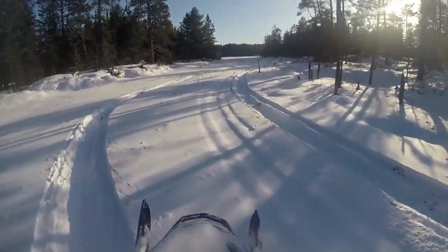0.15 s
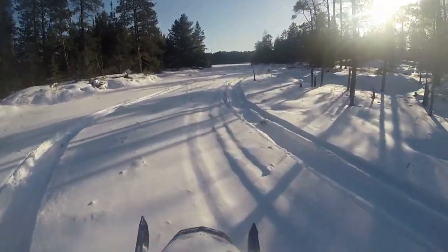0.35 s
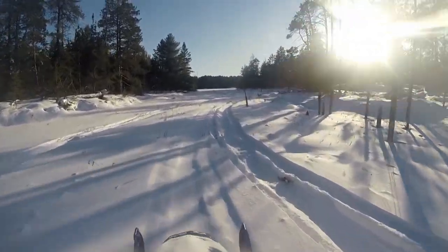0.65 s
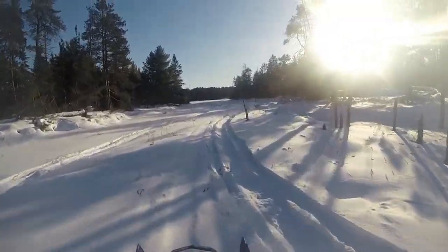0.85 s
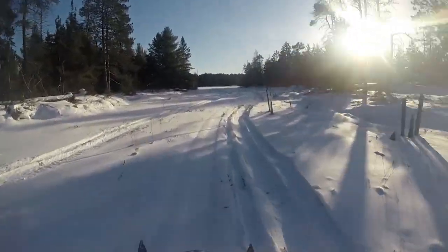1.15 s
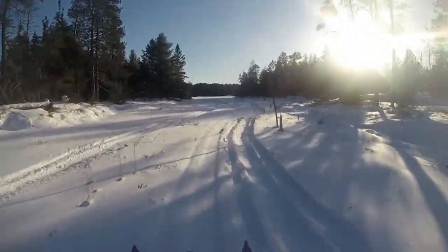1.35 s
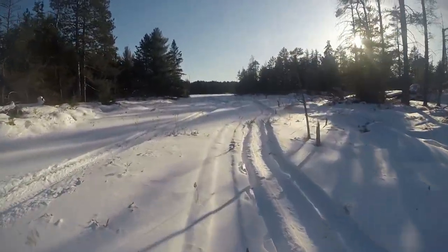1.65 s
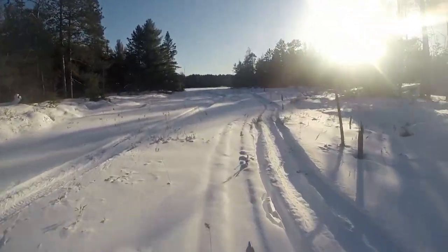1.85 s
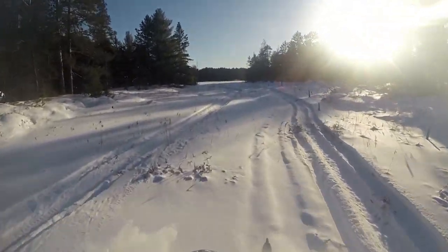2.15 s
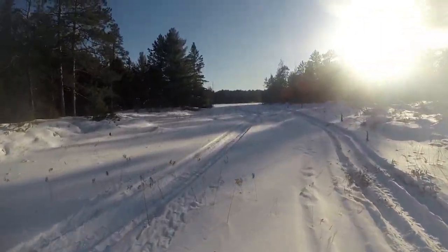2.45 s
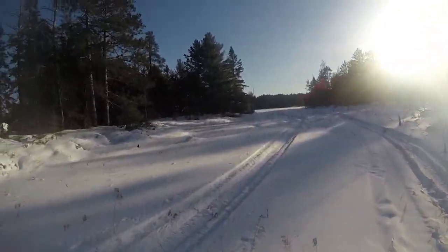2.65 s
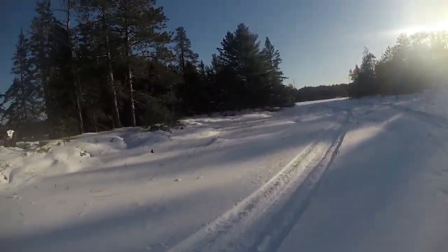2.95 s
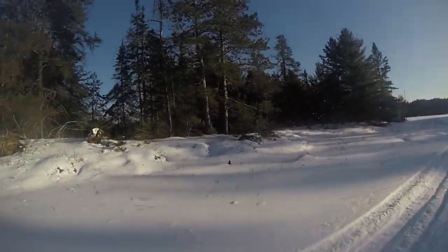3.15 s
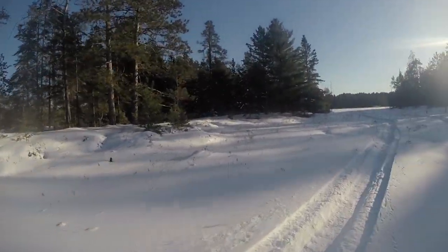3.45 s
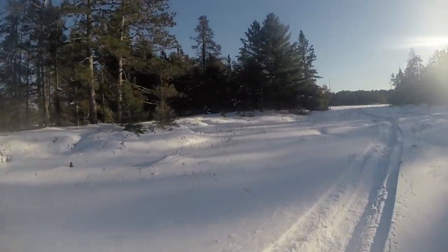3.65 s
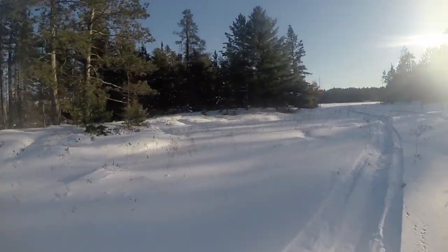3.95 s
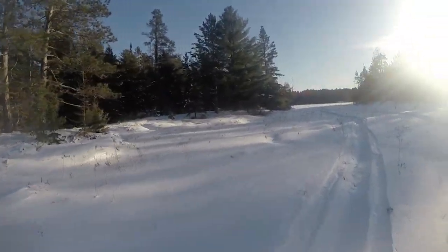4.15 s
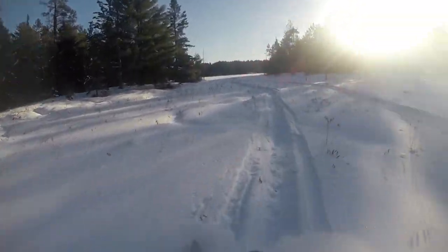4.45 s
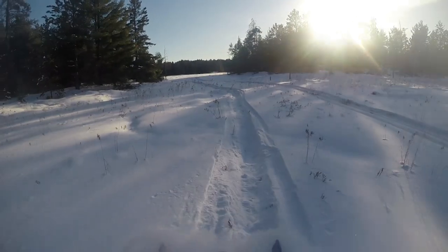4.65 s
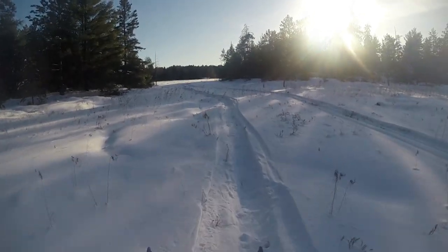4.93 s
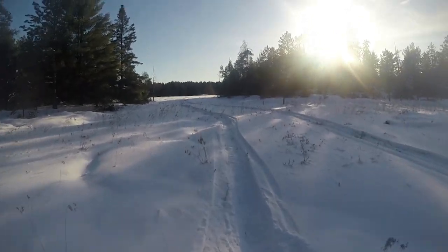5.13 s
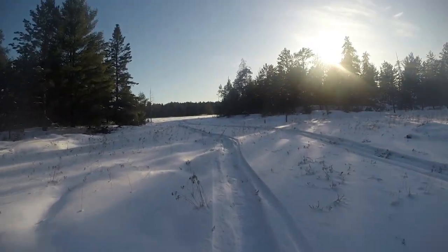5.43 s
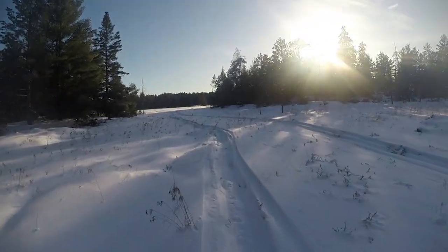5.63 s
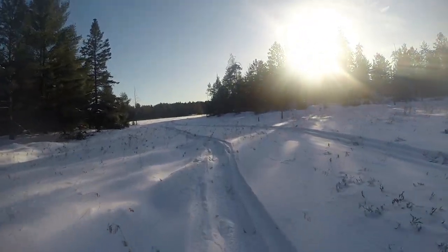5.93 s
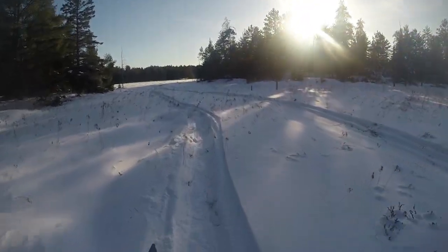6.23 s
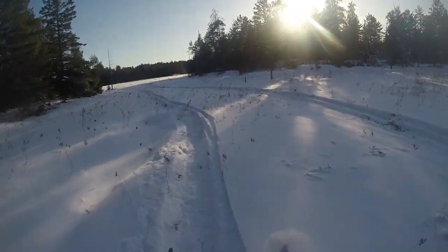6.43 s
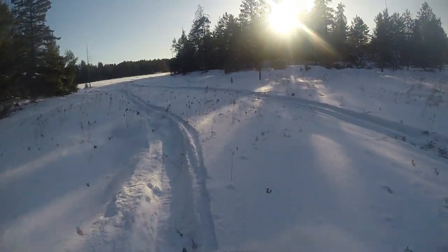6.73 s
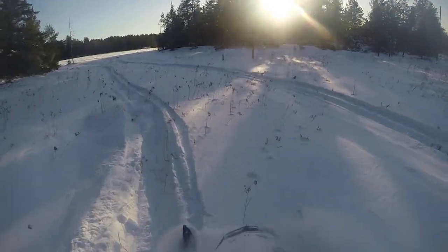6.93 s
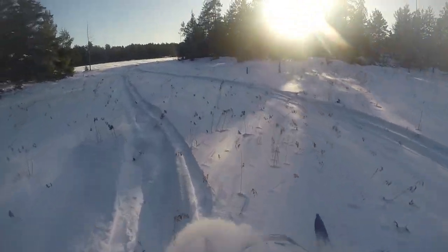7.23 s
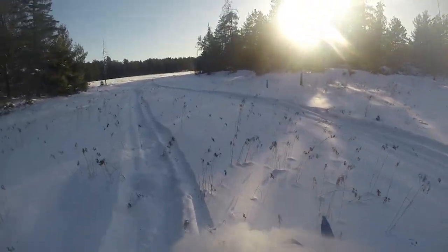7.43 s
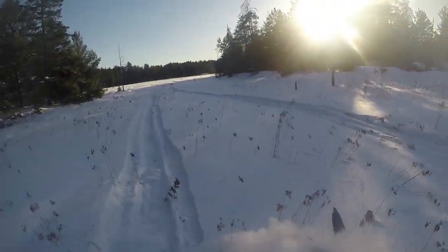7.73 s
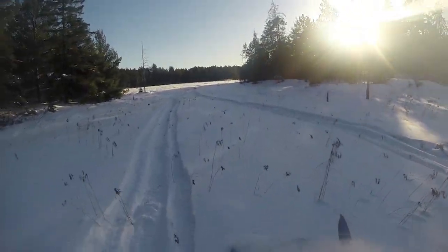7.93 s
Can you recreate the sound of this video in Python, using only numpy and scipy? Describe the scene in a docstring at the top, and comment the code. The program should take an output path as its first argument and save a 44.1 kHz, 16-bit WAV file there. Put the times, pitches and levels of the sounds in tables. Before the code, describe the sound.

Close, boxed-in sound of a snowmobile from the rider's helmet. The engine screams with a fuzzy track whine for the first second, then falls to a lower buzzing growl, sagging quietest just after four seconds. It surges, climbs to a brief peak around six, drops back, and finally revs up loud. Snow hiss, low mount thrum and a few ice ticks surround it.

```python
"""A three-cylinder snowmobile engine heard through a closed camera case on the rider's helmet.
Sines on crank orders and noise puffed at each firing make its notes and exhaust roar, led by speed and load.
The track adds a hum and a fuzzy chain whine; the skis scrape the snow in a narrow band of noise.
A low wavering note and filtered noise make the mount's thrum and the wind and chassis rumble,
and short noise bursts are ice grains and spray striking the case."""
import sys
import numpy as np
from scipy import signal
from scipy.fft import rfft, irfft
from scipy.io import wavfile
from scipy.ndimage import map_coordinates

SR = 44100
rng = np.random.default_rng(int(sys.argv[2]) if len(sys.argv) > 2 else 0)


def waveform_to_disk(signal):
    """Save audio, clipped to [-1, 1], as 16-bit WAV at the path in sys.argv[1]."""
    frames = np.transpose(np.atleast_2d(signal))
    scaled = np.clip(frames, -1, 1) * 32767
    samples = np.round(scaled).astype(np.int16)
    wavfile.write(sys.argv[1], SR, samples)


N = 356328

# What the case lets through: (frequency [Hz], gain [dB])
CASE_RESPONSE = [(330, -17.5), (470, -19), (520, -19), (700, -22), (940, -27), (1040, -16.5), (1130, -4),
                 (1300, 2), (1500, 0), (1640, -10.5), (1790, -2), (2160, -10), (2600, -4.5), (2850, -12),
                 (3260, -10), (3520, -28.5), (4000, -29)]

BOOM_ORDERS = (3, 4, 5, 6, 9)  # multiples of the crank speed
UPPER_ORDERS = (7, 8, *range(10, 21))
MID_CRANK_HZ, MID_LUG_HZ, MID_LOUD_DB = 102.9, 140.4, -24  # reference points for the level slopes
GRIP_LUG_HZ = 217  # the track slips above this


def amp(db):
    """Decibels to gain."""
    return 10 ** (np.asarray(db) / 20)


def evened(x):
    """Scales to rms 1."""
    return x / np.sqrt(np.mean(x ** 2) + 1e-20)


def curves(rows):
    """Every column after the time, drawn as straight lines with one value a sample."""
    s, *columns = np.transpose(rows)
    return [np.interp(np.arange(N) / SR, s, c) for c in columns]


def read(points, hz):
    """Value of a spectrum at hz, interpolated along log frequency."""
    f, value = np.transpose(points)
    return np.interp(np.log(hz + 1), np.log(f + 1), value)


def bumps(x, rows):
    """Sum of bell shapes (centre, width, height) along x."""
    return sum(height * np.exp(-((x - at) / width) ** 2) for at, width, height in rows)


def wander(top_hz):
    """Slow random curve of rms 1, with 2 * top_hz random points a second joined by straight lines."""
    knots = rng.standard_normal(1000)
    return evened(map_coordinates(knots, [np.arange(N) / SR * 2 * top_hz], order=1))


def coloured(db_of, lo_hz, hi_hz):
    """Noise of rms 1 shaped by db_of(hz), with steep skirts outside the edges."""
    hz = np.fft.rfftfreq(N, 1 / SR) + 1e-3
    skirts = 1 / np.sqrt((1 + (lo_hz / hz) ** 16) * (1 + (hz / hi_hz) ** 16))
    spectrum = rfft(rng.standard_normal(N)) * amp(db_of(hz)) * skirts
    return evened(irfft(spectrum, N))


def resonate(x, hz, width):
    """A resonance that can glide: shifts hz down to zero, smooths twice and shifts back."""
    turn = np.exp(2j * np.pi * np.cumsum(hz * np.ones(N)) / SR)
    r = np.exp(-np.pi * width / SR)
    smooth = signal.lfilter([(1 - r) ** 2], [1, -2 * r, r * r], x / turn)
    return 2 * (turn * smooth).real


def ground_doublings(lug_hz):
    """Ground speed in doublings from the reference; it stops rising once the track slips."""
    return np.log2(np.minimum(lug_hz, GRIP_LUG_HZ) / MID_LUG_HZ)


def mount(loud_db):
    """The helmet mount shakes at its own low note over wind and chassis rumble."""
    # Slow swells and dips of the thrum: (time [s], bell width [s], level change [dB])
    thrum_swells = [(.18, 0.1, 10), (.6, 0.27, 7.5), (1.15, 0.089, 2.5), (1.4, 0.13, 14.5), (2.2, 0.32, -1),
                    (2.62, 0.24, 7.5), (3.25, 0.17, 1.5), (4.268, .12, 7), (4.7, .25, 0), (5.5, 0.32, 3.5),
                    (6.35, .12, 10), (6.9, 0.18, 11), (7.3, .25, 8)]
    # Wind and chassis rumble: (time [s], level [dB])
    rumble_level = [(0, -38.5), (1, -36.5), (1.7, -42.5), (2.9, -43.5), (3.4, -47), (3.75, -48), (4.3, -51),
                    (4.7, -46), (5.2, -39.5), (5.8, -43.5), (7, -40.5), (8.08, -45.5)]
    # Colour of the rumble: (frequency [Hz], relative density [dB per Hz])
    rumble_colour = [(32, -30), (55, -19), (81, -2), (119, -2), (232, -8.5), (337, -9), (456, -0.5),
                     (482, 1), (520, -43), (680, -38), (1140, -120)]
    base_db, calm_below_db, calm_share = -43.5, -26.5, 0.83

    # The thrum sinks when the engine is quieter than calm_below_db
    calm_db = calm_share * np.minimum(loud_db - calm_below_db, 0)
    thrum_db = base_db + calm_db + bumps(np.arange(N) / SR, thrum_swells)
    note_hz = 40.5 + 2.5 * wander(top_hz=6.)
    note = np.sqrt(2) * np.sin(2 * np.pi * np.cumsum(note_hz) / SR)
    shake = 0.86 * note * amp(2.9 * wander(top_hz=7.))
    shake += 0.52 * coloured(lambda hz: 0 * hz, lo_hz=16, hi_hz=56)
    rumble = coloured(lambda hz: read(rumble_colour, hz), lo_hz=58, hi_hz=484)
    return amp(thrum_db) * shake + amp(curves(rumble_level)[0]) * rumble


def ticks():
    """Ice grains and sprays of snow strike the case: bright noise bursts that rise fast and die away."""
    # (time [s], peak level [dB], band centre [Hz], decay time constant [s])
    strikes = [(1.2126, -18, 5350, 0.0019), (1.736, -18.5, 3070, 0.13), (2.385, -18.5, 3000, 0.21),
               (2.7093, -31, 8930, 0.00057), (3.517, -31, 10000, .0005), (3.619, -54, 10500, 0.0041),
               (3.951, -46, 9000, 0.028), (6.221, -21, 7100, 0.0042), (6.257, -25, 9530, 0.0028),
               (6.373, -30, 8400, .002)]
    out, t = np.zeros(N), np.arange(SR // 2) / SR
    for s, db, hz, decay in strikes:
        edges_hz = [0.5 * hz, min(1.2 * hz, .45 * SR)]
        band = signal.butter(3, edges_hz, "band", fs=SR, output="sos")
        envelope = np.exp(-t / decay) * (1 - np.exp(-10 * t / decay))
        burst = signal.sosfilt(band, rng.standard_normal(len(t))) * envelope
        out[round(s * SR):][:len(t)] += amp(db) * burst / abs(burst).max()
    return out


def skis(lug_hz, throttle):
    """The skis scrape the crust in a narrow, flickering hiss that follows ground speed."""
    base_db, open_db, db_per_doubling = -47.5, -12.5, 11.  # fainter while power lifts the skis
    db = base_db + open_db * throttle + db_per_doubling * ground_doublings(lug_hz)
    scrape = coloured(lambda hz: 0 * hz, lo_hz=3450, hi_hz=4630)
    return amp(db + 1.0 * wander(top_hz=13.0)) * scrape


def track(lug_hz, throttle):
    """Lugs slap the drivers in a soft hum; the chain sings a fuzzy line above while the track spins free."""
    base_db, open_db, db_per_doubling = -48, -5.5, 6.5  # softer while the engine pulls
    spin_start_s, spin_end_s, spin_edge_s, whine_db = .1, 0.99, .06, -23
    chain_ratio = 4.35  # chain teeth for each track lug

    hum_db = base_db + open_db * throttle + db_per_doubling * np.log2(lug_hz / MID_LUG_HZ)
    phase = 2 * np.pi * np.cumsum(lug_hz) / SR + 0.45 * wander(top_hz=11.0)
    hum = np.sqrt(2) * np.sin(phase) * amp(hum_db + 2.9 * wander(top_hz=8.7))

    t = np.arange(N) / SR
    spin = np.clip(np.minimum(t - spin_start_s, spin_end_s - t) / spin_edge_s + .5, 0, 1)
    whine = evened(resonate(rng.standard_normal(N), chain_ratio * lug_hz, width=40.0))
    return hum + amp(whine_db) * spin * whine


def brightness(loud_db, crank_hz, lug_hz, base_db, per_db, per_hz, per_doubling, sway_share):
    """Level in dB of a treble layer from engine loudness, crank speed, ground speed and a slow sway."""
    # The treble swells and sinks on its own besides: (time [s], level change [dB])
    treble_sway = [(0, 1.5), (1.2, 2.8), (1.9, 2.5), (2.8, 1), (3.2, -3.5), (3.9, -2), (4.4, -3), (4.75, 4),
                   (5.6, -0.1), (6.2, 2.5), (6.5, -0.5), (7, 0.7), (7.5, 0.7), (8.08, 2.5)]
    engine_db = per_db * (loud_db - MID_LOUD_DB) + per_hz * (crank_hz - MID_CRANK_HZ)
    ground_db = per_doubling * ground_doublings(lug_hz)
    return base_db + engine_db + ground_db + sway_share * curves(treble_sway)[0]


def buzz(crank_hz, turns, multiples, colour):
    """A close stack of high crank orders, each coming and going by chance; rms 1."""
    shape_db = [read(colour, k * crank_hz) for k in multiples]
    lines = sum(amp(db + 4.2 * wander(top_hz=4.)) * np.sin(2 * np.pi * (k * turns + rng.random()))
                for k, db in zip(multiples, shape_db))
    total = np.sqrt(np.sum(amp(shape_db) ** 2, axis=0))
    return evened(lines / total)


def roar(crank_hz, turns, clear_db, loud_db, can_db, lug_hz):
    """Exhaust turbulence puffed at each firing, one cylinder stronger, with snow hiss and intake fizz above."""
    # Colour of the hiss and fizz: (frequency [Hz], relative density [dB per Hz])
    treble = [(1940, -26), (3300, -3.5), (3610, -11), (4360, -6.5), (5020, -8.5), (5480, -8.5), (6420, -13),
              (6980, -21.5), (7530, -17.5), (8120, -22), (9160, -17), (11100, -23), (12700, -25),
              (14300, -35), (15000, -34)]
    # Panels that ring in the roar: (frequency [Hz], width [Hz], level against the body noise [dB])
    panels = [(1142, 35, -14.5), (1290, 46, -8.5), (2052, 67, -11), (4330, 200, -27), (5360, 52.9, -32)]
    can_hz, can_width_hz = 1630.6, 101
    speeds = loud_db, crank_hz, lug_hz
    rasp_db = brightness(*speeds, base_db=-35.5, per_db=0.55, per_hz=0.01, per_doubling=6., sway_share=0.87)
    hiss_db = brightness(*speeds, base_db=-46.5, per_db=0.74, per_hz=0.07, per_doubling=7, sway_share=0.3)
    fizz_db = brightness(*speeds, base_db=-50, per_db=0, per_hz=0.3551, per_doubling=0, sway_share=1.3)
    drive = rng.standard_normal(N)  # one turbulence excites the panels and the exhaust can

    body = coloured(lambda hz: read(CASE_RESPONSE, hz), lo_hz=273, hi_hz=2010)
    body += sum(amp(db) * evened(resonate(drive, hz, width)) for hz, width, db in panels)
    # What the order lines lose turns to roar
    body_db = loud_db - 7.5 - 0.48 * np.maximum(clear_db, -9.)
    body *= amp(body_db + 0.21 * wander(top_hz=24.54))
    can = evened(resonate(drive, can_hz, can_width_hz)) * amp(can_db)

    # The highest orders show mostly near full speed
    near_full_db = clear_db - 0.34 * np.maximum(125. - crank_hz, 0)
    rasp = coloured(lambda hz: read(CASE_RESPONSE, hz), lo_hz=2195, hi_hz=4000)
    rasp += buzz(crank_hz, turns, range(21, 27), CASE_RESPONSE) * amp(near_full_db - 2.4)
    rasp *= amp(rasp_db + 1.34 * wander(top_hz=20.))
    hiss = coloured(lambda hz: read(treble, hz), lo_hz=3000, hi_hz=7500)
    hiss += buzz(crank_hz, turns, range(27, 50), treble) * amp(near_full_db)
    hiss *= amp(hiss_db + 1.3 * wander(top_hz=15.))
    fizz = coloured(lambda hz: read(treble, hz), lo_hz=6570, hi_hz=16000)
    fizz *= amp(fizz_db + 0.71 * wander(top_hz=20.0))

    # Three firings a turn, plus one stronger cylinder once a turn
    puff = evened(1 + 0.13 * np.cos(2 * np.pi * 3 * turns) + 0.11 * np.cos(2 * np.pi * turns))
    return puff * (body + can + rasp + hiss + fizz)


def clarity():
    """Level changes in dB of the upper orders and the boom: each change ramps in and recovers."""
    # The upper orders and the boom dip or swell for a moment:
    # (time [s], ramp in [s], recovery [s], upper orders change [dB], boom change [dB])
    level_dips = [(.96, 0.1, 0.26, -16, -23), (1.32, 0.44, 0.13, -22, -7), (1.7, 0.28, 0.61, -2.5, -2.5),
                  (3.7, 0.14, 0.37, -5, -16), (5.25, .3, 0.49, -2, -0.5), (6.26, 0.1, 0.19, -15, 5),
                  (6.42, 0.17, 0.15, -14, 0.5), (6.92, .2, 0.19, -5, 1.5)]
    t = np.arange(N) / SR
    return sum(np.outer(change_db, np.interp(t, [s - ramp, s, s + back], [0, 1, 0]))
               for s, ramp, back, *change_db in level_dips)


def boom_levels(crank_hz, loud_db, boom_change_db, throttle):
    """Orders 3 to 6 follow the pipe's gain at their pitch and the throttle; the ninth goes its own way."""
    # One row for each of orders 3 to 6:
    # (strength [dB], change with throttle shut [dB], slope with crank speed [dB per Hz])
    boom_strength = [(0.5, -1.5, 0.02), (0.5, -21.5, 0.2035), (-3.5, -20.5, 0.09), (-9.5, -10, -0.1846)]
    # What the exhaust pipe favours: (frequency [Hz], gain [dB])
    pipe = [(180, -39), (205, -20), (240, -24.5), (265, -14), (290, -18), (335, -32), (360, -27),
            (385, -14), (410, -6), (440, -12.5), (474, -9), (497, -37), (700, -33.5), (820, -6), (900, -25)]
    # The ninth order is loud at the start and end, near full speed, and faint between:
    # (time [s], level [dB])
    ninth = [(0, -29), (.1, -19.5), (.3, -21), (.42, -22), (.9, -28.5), (1.0, -45), (1.3, -64.5),
             (4.8, -65.5), (5.2, -54), (5.7, -47), (6.17, -42), (6.28, -55), (6.6, -54.5), (7.0, -67),
             (7.5, -52.5), (7.7, -35), (7.79, -14), (7.87, -21), (8.08, -13.5)]
    levels = []
    for k, (strength_db, shut_db, per_hz) in zip(BOOM_ORDERS, boom_strength):
        speed_db = per_hz * (crank_hz - MID_CRANK_HZ)
        own_db = strength_db + (1 - throttle) * shut_db + read(pipe, k * crank_hz)
        levels.append(loud_db + boom_change_db + speed_db + own_db)
    return levels + curves(ninth)


def boom(turns, levels_db):
    """The strongest exhaust notes as wavering sines, with a faint first and second order under them."""
    notes = np.zeros(N)
    for k, db in zip(BOOM_ORDERS, levels_db):
        phase = 2 * np.pi * k * turns + 0.16 * wander(top_hz=12.0)
        notes += amp(db + 0.43 * wander(top_hz=12.)) * np.sin(phase)
    under = amp(-49.0) * np.sin(2 * np.pi * turns)
    under += amp(0.6 * levels_db[0] - 30) * np.sin(2 * 2 * np.pi * turns)
    return np.sqrt(2) * (notes + under * amp(2.5 * wander(top_hz=3.6)))


def orders(crank_hz, turns, loud_db, clear_db, throttle):
    """Sines on multiples of the crank; uneven burning makes each one waver in level and phase."""
    # One row for each upper order: (level with throttle open [dB], level with it shut [dB])
    order_levels = [(-15.5, -11.5), (-10.5, -11), (-14, -10.5), (-13, -4), (-8.5, -6), (-15, -10),
                    (-13, -10), (-12.5, -10.5), (-14.5, -7), (-11.5, -9.5), (-16, -17), (-14, -19),
                    (-12, -13.5)]
    # Orders swell or sink as they cross these: (frequency [Hz], bell width [Hz], level change [dB])
    swells = [(740.2, 92, -12), (990, 56, 5.5), (1157, 21, 5.5), (1234, 18, 3.5), (1286, 21, 6),
              (1432, 36, -3.5), (1450, 31, 3.5), (1648, 28, 7)]
    db_per_hz = 0.154  # rise with crank speed
    out = np.zeros(N)
    drive_db = loud_db + clear_db + db_per_hz * (crank_hz - MID_CRANK_HZ)
    for k, (open_db, shut_db) in zip(UPPER_ORDERS, order_levels):
        hz = k * crank_hz
        throttle_db = throttle * open_db + (1 - throttle) * shut_db
        db = drive_db + throttle_db + bumps(hz, swells) + read(CASE_RESPONSE, hz)
        phase = 2 * np.pi * (k * turns + rng.random()) + .018 * k * wander(top_hz=14.)
        out += np.sqrt(2) * amp(db + 2.4 * wander(top_hz=5.)) * np.sin(phase)
    return out


def scene():
    """Engine, track, skis, mount and ticks at one microphone."""
    # Engine speed: (time [s], crank turns [Hz])
    crank_speed = [(0.0, 137.5), (0.1, 138.2), (0.25, 141.5), (0.4, 137.2), (0.54, 136.5), (0.76, 130.2),
                   (0.9, 129.5), (0.96, 126.4), (1.08, 102.6), (1.3, 86.6), (1.44, 83.87), (2.05, 80.03),
                   (2.65, 86.9), (2.9, 87.5), (3.11, 87.96), (3.26, 83.76), (3.56, 82.7), (3.89, 69.7),
                   (4.21, 63.76), (4.5, 62.4), (4.57, 64.53), (4.79, 90.5), (4.86, 93.4), (5.02, 95.46),
                   (5.17, 100.8), (5.28, 96.65), (5.4, 93.4), (5.8, 103.5), (6.18, 129.2), (6.34, 106.4),
                   (6.43, 100.1), (6.57, 96.23), (6.84, 93.3), (6.93, 92.45), (7.02, 87.9), (7.16, 96.43),
                   (7.45, 102.9), (7.56, 107.3), (7.7, 118.5), (7.85, 133.7), (7.94, 136.1), (8.08, 136.8)]
    # Engine load: (time [s], engine loudness [dB], ring of the exhaust can [dB], throttle [0-1])
    engine_load = [(0.0, -17.5, -25, 0.93), (0.42, -19, -31, 0.94), (0.68, -18.5, -36, 1),
                   (.86, -19.5, -32, 0.44), (0.98, -17, -36, .3), (1.12, -24, -35, 0.05),
                   (2.1, -23.5, -38, 0.16), (2.61, -24.5, -38, 0.52), (3.25, -27, -38.5, 0.31),
                   (3.58, -26, -36, .3), (3.77, -31, -41.5, 0.24), (4.2, -30, -41.5, 0.06),
                   (4.48, -30, -43, 0.64), (4.57, -23, -39, 0.7), (4.84, -22.5, -30, 0.84),
                   (5.08, -25, -32.5, 0.84), (5.44, -26, -25, 0.96), (5.68, -26, -27.5, 0.85),
                   (6.1, -20.5, -22.5, 1), (6.2, -22.5, -25, 0.52), (6.34, -25, -34, .25),
                   (6.5, -25, -35, 1), (6.85, -23.5, -29.5, 0.93), (6.95, -27, -32.5, .3),
                   (7.06, -22.5, -28, 0.93), (7.48, -23, -32.5, 0.88), (7.82, -19, -23, 0.92),
                   (8.08, -23, -21.5, 0.83)]
    # Track speed: (time [s], lugs passing [Hz])
    track_speed = [(0, 270), (.3, 360), (.45, 376), (.6, 350), (.75, 300), (1.08, 257), (1.2, 215),
                   (1.42, 181), (2.32, 149), (3.17, 128), (4.59, 77), (5.31, 132), (5.67, 120), (6.25, 190),
                   (6.45, 174.6), (6.75, 136), (7.1, 132), (7.54, 140), (7.76, 176), (7.95, 228),
                   (8.08, 240)]
    crank_hz, lug_hz = curves(crank_speed)[0], curves(track_speed)[0]
    loud_db, can_db, throttle = curves(engine_load)
    clear_db, boom_change_db = clarity()
    turns = np.cumsum(crank_hz) / SR

    background = mount(loud_db) + ticks() + skis(lug_hz, throttle) + track(lug_hz, throttle)
    engine = roar(crank_hz, turns, clear_db, loud_db, can_db, lug_hz)
    engine += boom(turns, boom_levels(crank_hz, loud_db, boom_change_db, throttle))
    engine += orders(crank_hz, turns, loud_db, clear_db, throttle)
    return (background + engine)[None]


def record(dry):
    """A slightly lopsided membrane adds a squared term, then the lows and highs are cut."""
    bent = dry + 0.064 * dry ** 2
    bent = signal.sosfilt(signal.butter(3, 18., "high", fs=SR, output="sos"), bent)
    edge_hz = 15150
    lowpass = signal.firwin(511, edge_hz, window=("kaiser", 9), fs=SR)
    return signal.oaconvolve(bent, lowpass[None], "same")


dry = scene()
out = record(dry)
waveform_to_disk(out)
```